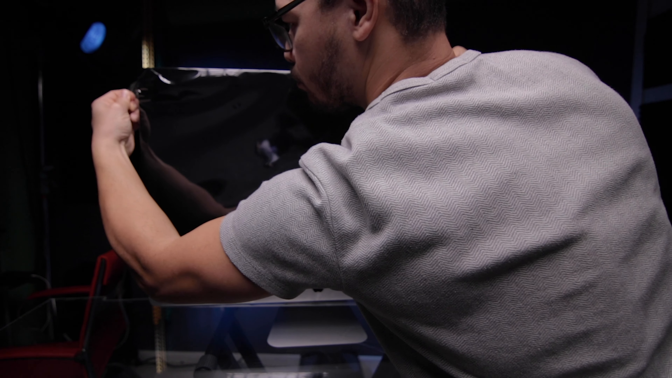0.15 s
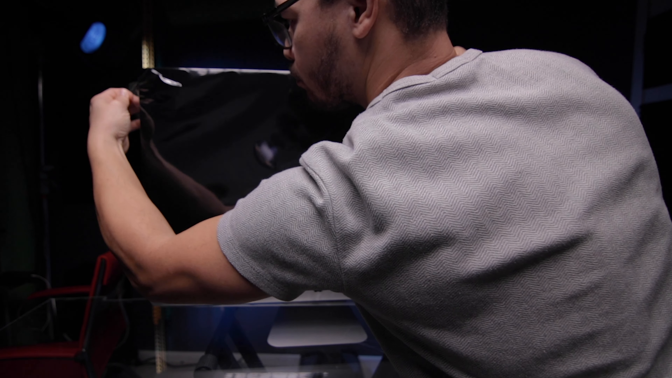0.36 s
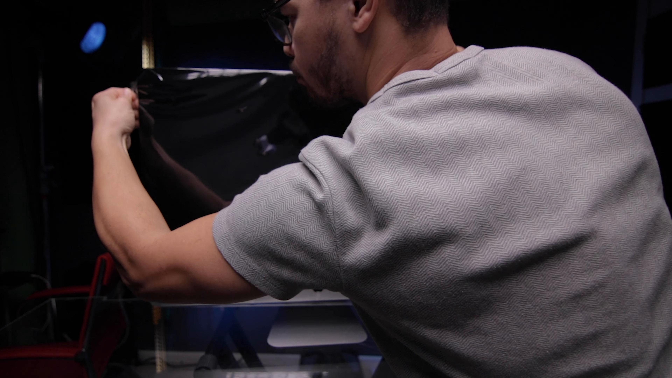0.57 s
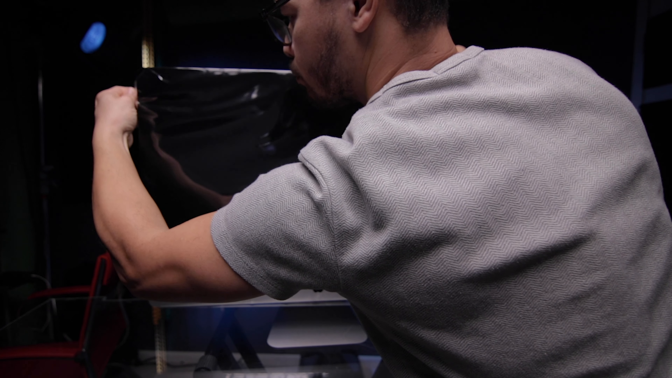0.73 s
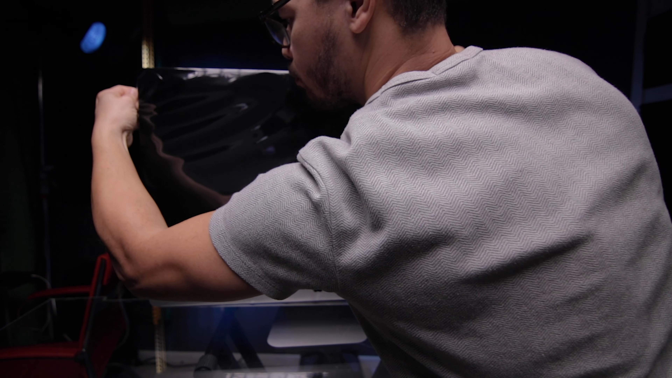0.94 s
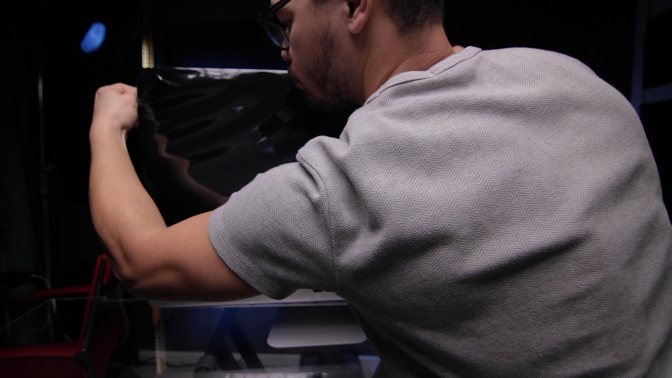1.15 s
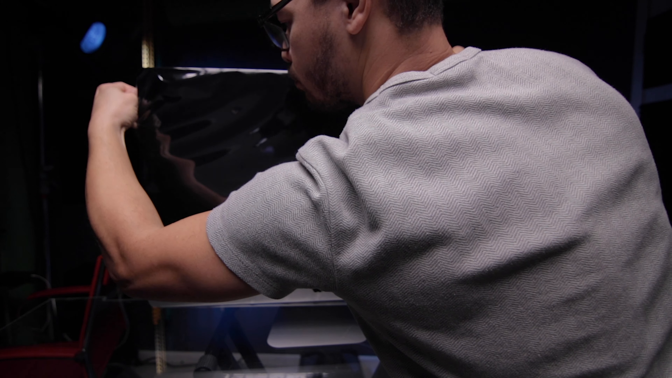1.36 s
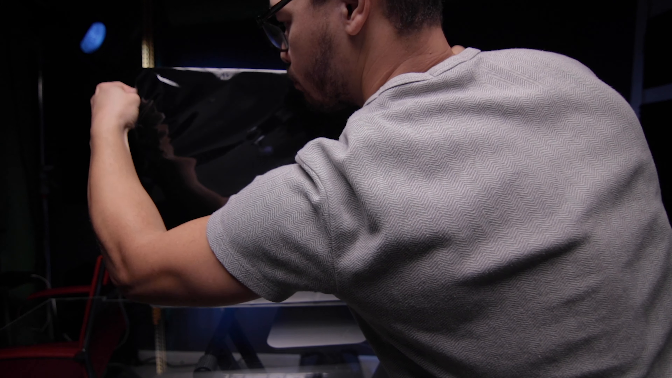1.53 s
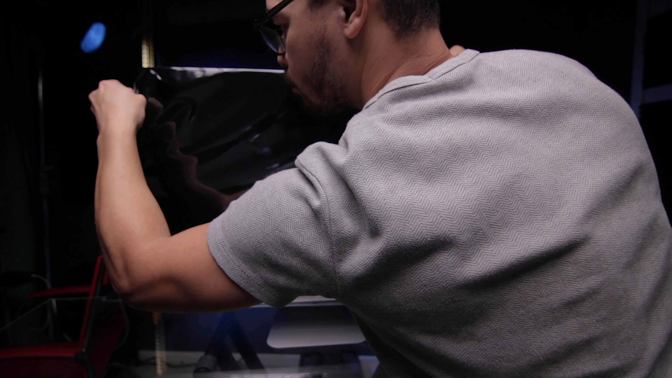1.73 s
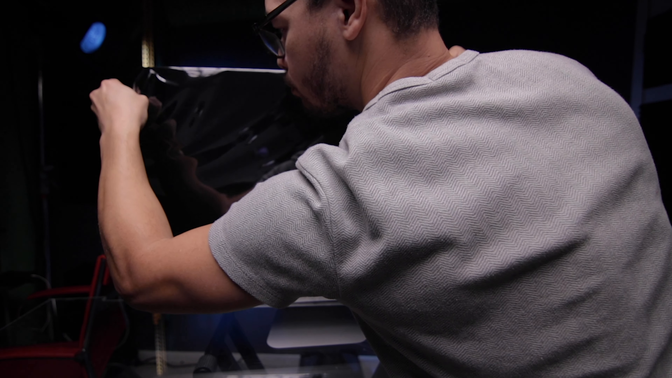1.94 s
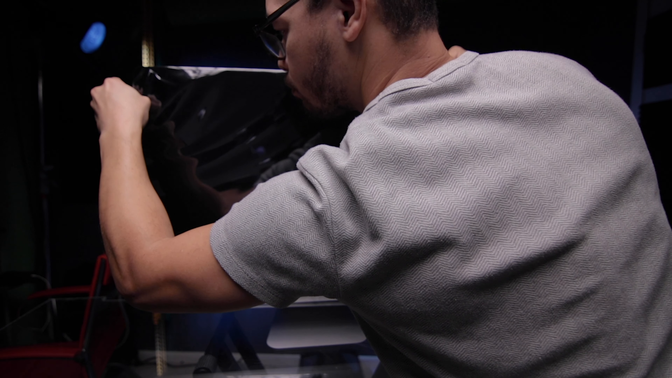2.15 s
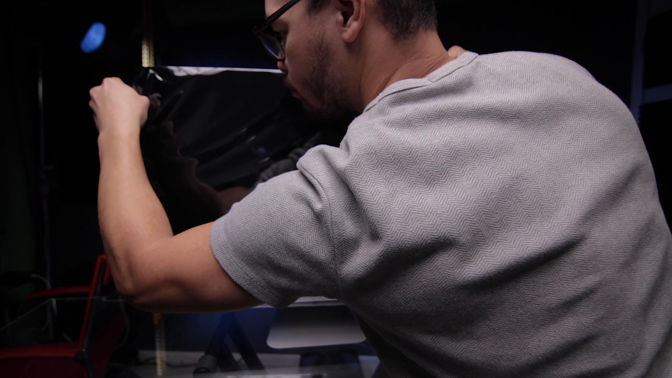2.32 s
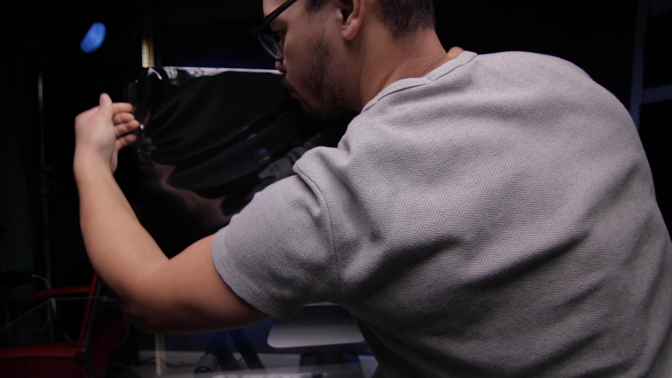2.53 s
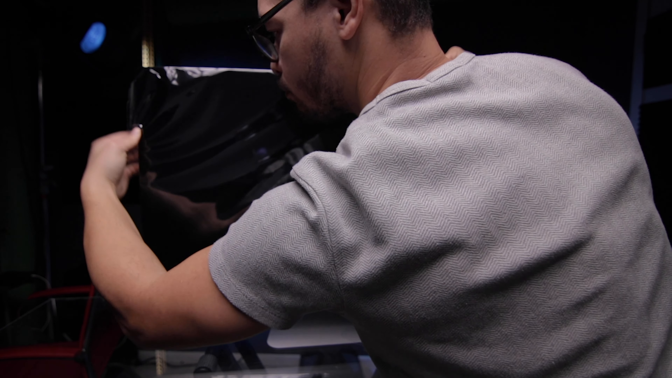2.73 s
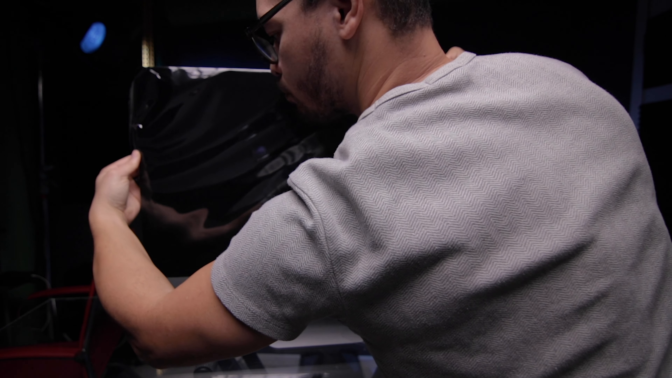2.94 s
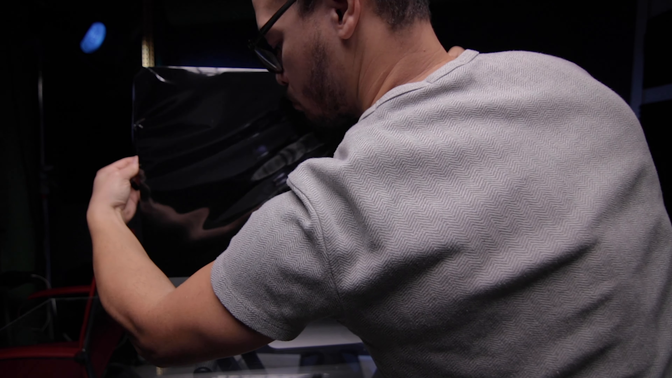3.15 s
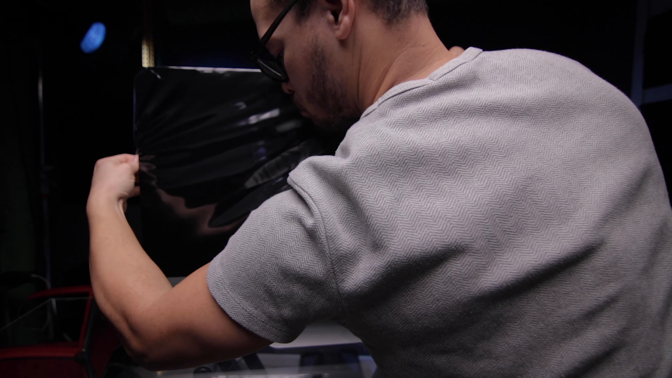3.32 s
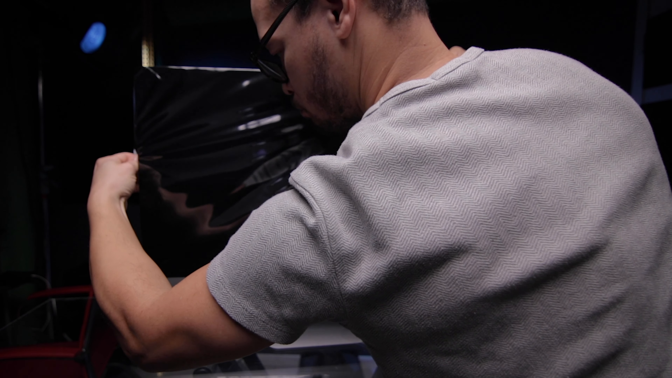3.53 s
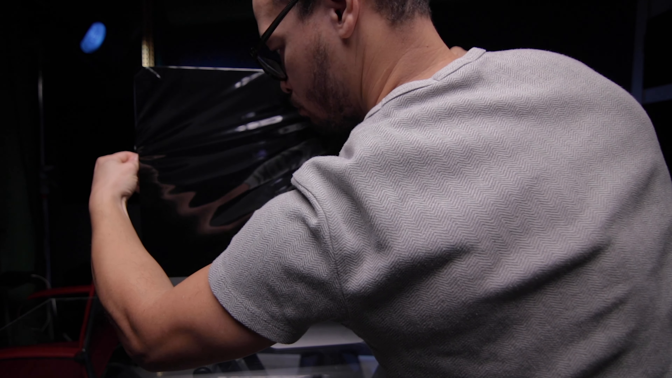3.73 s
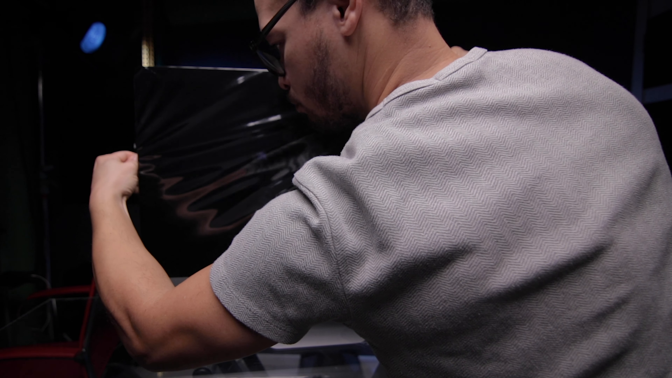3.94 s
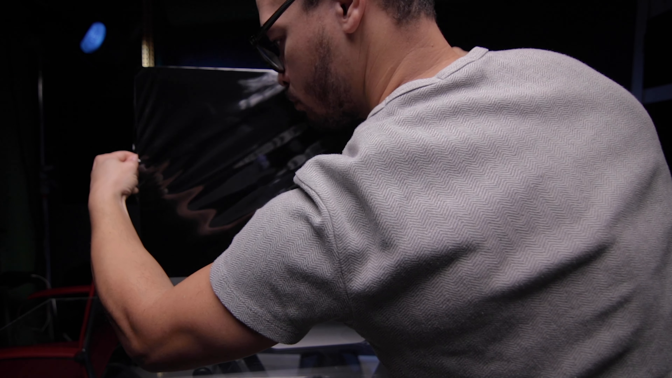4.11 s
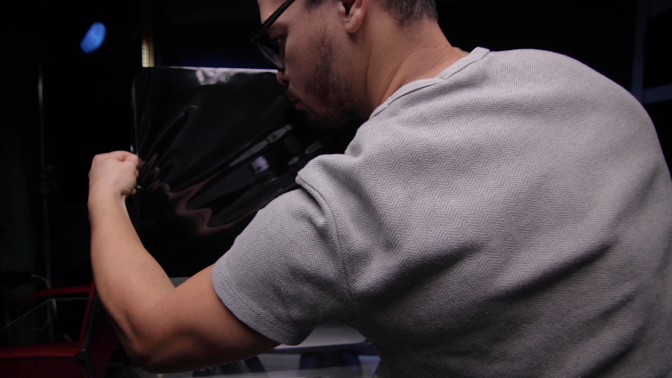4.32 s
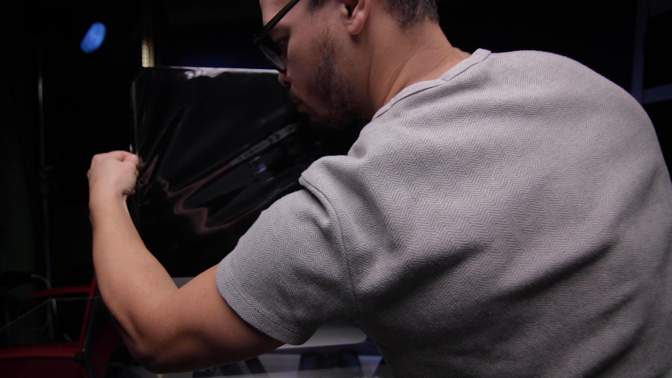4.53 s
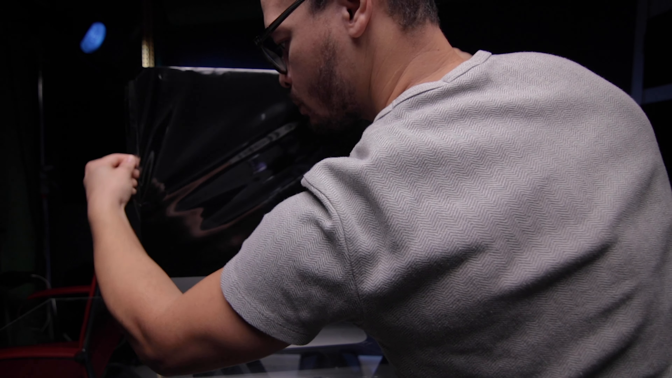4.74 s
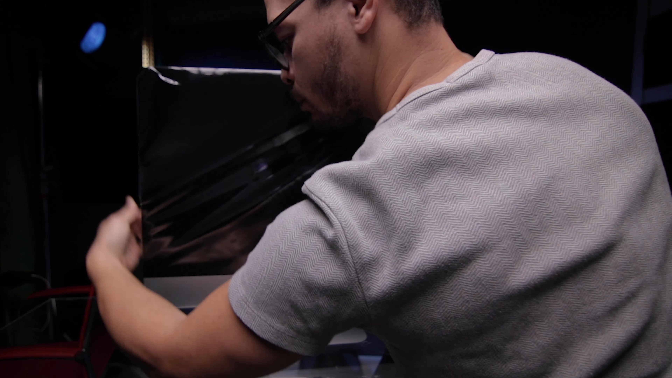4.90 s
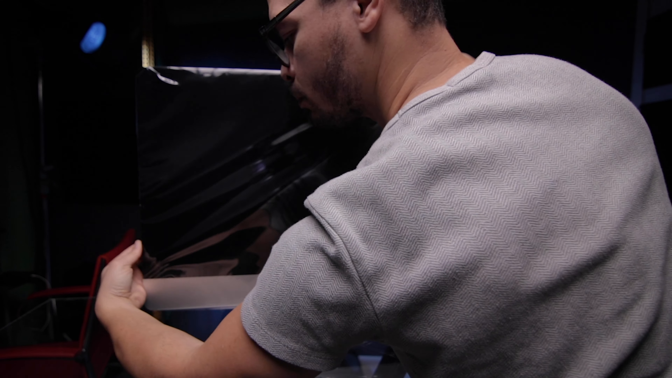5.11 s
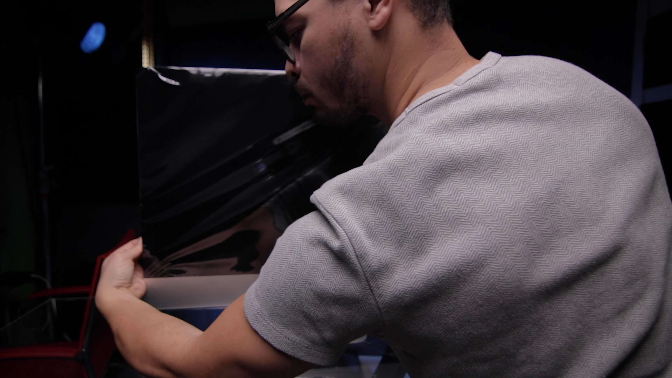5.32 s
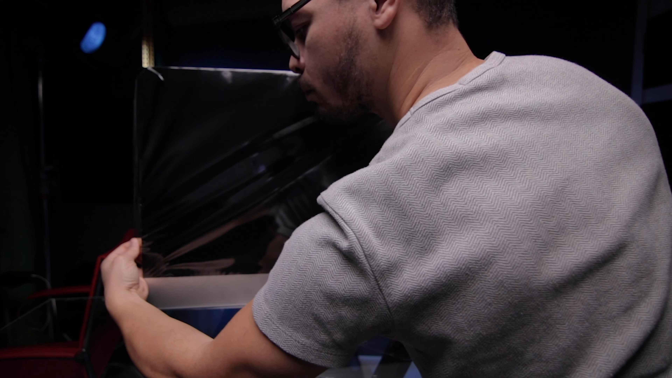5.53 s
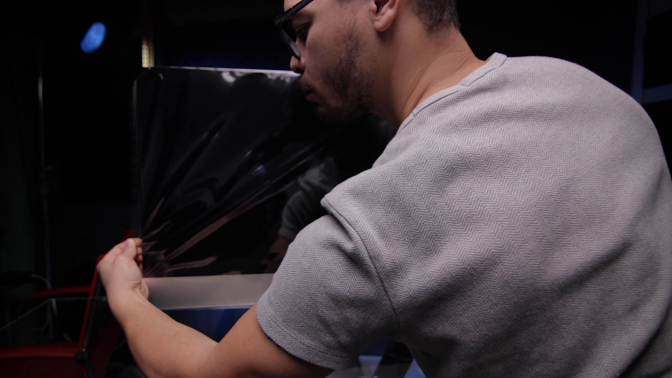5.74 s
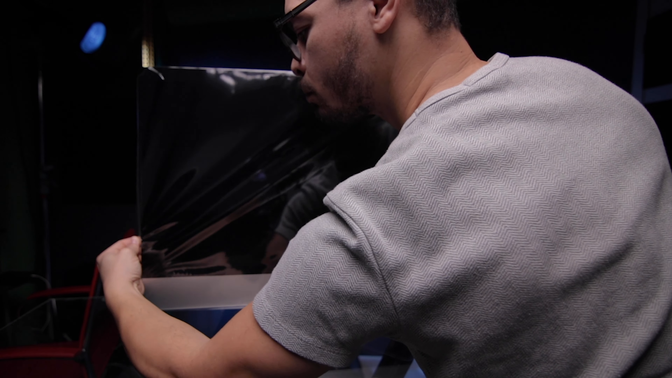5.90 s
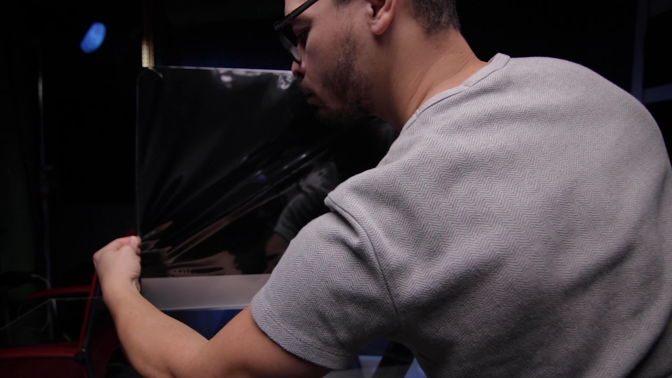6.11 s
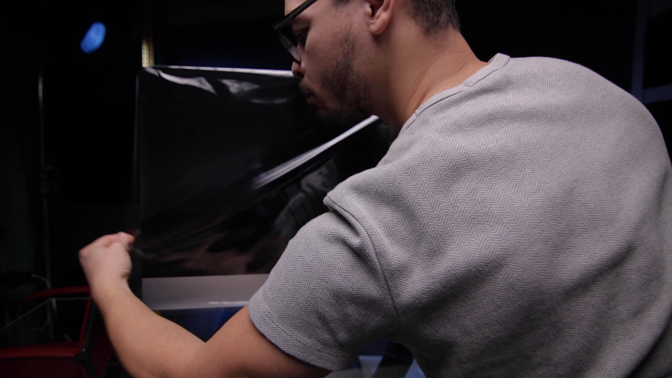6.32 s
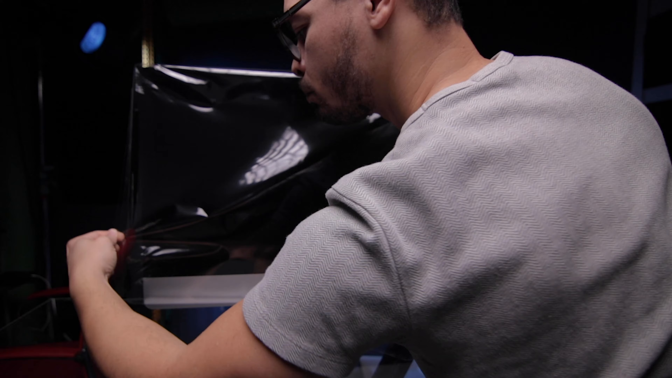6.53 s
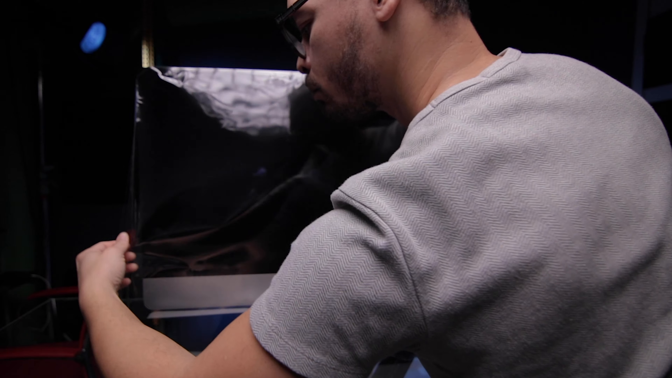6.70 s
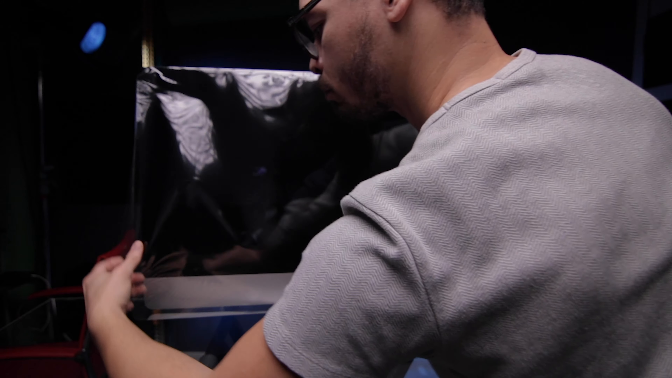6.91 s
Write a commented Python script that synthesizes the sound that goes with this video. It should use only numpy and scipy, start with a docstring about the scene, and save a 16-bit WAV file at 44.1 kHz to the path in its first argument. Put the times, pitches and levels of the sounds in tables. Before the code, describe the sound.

Taut plastic sheet lets go of smooth glass in jerks: dry, bright clicks over fine crackle, some with a hollow, drum-like flap. Clusters alternate with near-silent gaps; the last third is busiest and peaks in one loud snap and short rip before soft crumpling fades. Close microphone, small indoor room with short reflections, low background noise and slight high hiss.

```python
"""Bright cracks and hollow flaps over fine crackle: a thin protective film is pulled off a large glass
screen in a small, dry room. The glue lets go in jerks; each is a filtered click: crease crack, sheet pop, fizz.
Taut film drums in decaying sines and the screen rings faintly at fixed modes. Random clicks make the
peel line crackle; ringing clicks make the film flex and crinkle, strongest towards the end.
Echoes and a short noise tail form the room; steady coloured noise and a faint, slowly varying hiss lie beneath."""
import sys
import numpy as np
from scipy import signal
from scipy.fft import rfft, irfft, next_fast_len
from scipy.io import wavfile

SR = 44100
rng = np.random.default_rng(int(sys.argv[2]) if len(sys.argv) > 2 else 0)


def generate_wav(signal):
    """Clip the signal to [-1, 1] and save it as 16-bit WAV at the path in sys.argv[1]."""
    frames = np.transpose(np.atleast_2d(signal))
    scaled = np.clip(frames, -1, 1) * 32767
    pcm = np.round(scaled).astype(np.int16)
    wavfile.write(sys.argv[1], SR, pcm)


N = 306936
TIME = np.arange(N) / SR
CUTOFF_HZ = 15900
PLACES = 4  # along the peel line

# pulls of the hand, which load the peel line and flex the sheet:
# hold_start_s, hold_s, crackle_db, flex_db
PULLS = [(0.032, 0.045, -61, -76), (0.318, 0.079, -66, -60.5), (0.546, 0.012, -80, -67),
         (.88, .02, -64, -58), (1.26, 0.028, -70, -54), (2.5, 0.082, -56.5, -56.5),
         (2.682, 0.011, -66.5, -59), (2.912, 0.14, -65, -71.5), (3.2, 0.21, -70, -70.5),
         (3.748, .005, -75, -67.5), (4.208, 0.044, -58.5, -70), (4.488, 0.019, -73.5, -66),
         (4.87, 0.051, -63, -60.5), (5.028, 0.041, -67, -63), (6.483, 0.046, -45.5, -72)]


def from_db(db):
    """Decibels to amplitude gain."""
    return 10 ** (np.asarray(db) / 20)


def rms_one(x):
    """Scale to unit rms."""
    return x / np.sqrt(np.mean(x ** 2) + 1e-20)


def at_hz(points, hz):
    """Interpolate (Hz, value) rows on a log-frequency axis."""
    freqs_hz, values = np.transpose(points)
    return np.interp(np.log(np.maximum(hz, 1)), np.log(freqs_hz), values)


def band(x, low_hz, high_hz, order=2):
    """Butterworth band-pass, kept below Nyquist."""
    high_hz = min(high_hz, .48 * SR)
    edges_hz = [min(low_hz, high_hz - 10), high_hz]
    return signal.sosfilt(signal.butter(order, edges_hz, "band", fs=SR, output="sos"), x)


def around(x, hz, octaves):
    """Broad resonance: a band of the given width, limited to 0.2-3 octaves."""
    half = 2 ** (np.clip(octaves, .2, 3) / 2)
    return band(x, hz / half, hz * half)


def coloured(x, spectrum):
    """Filter by (Hz, dB) rows and scale to unit rms."""
    size = next_fast_len(N)
    bins_hz = np.arange(size // 2 + 1) * SR / size
    shaped = rfft(x, size) * from_db(at_hz(spectrum, bins_hz))
    return rms_one(irfft(shaped, size)[:N])


def ring(x, hz, t60_s):
    """One mode: a unit click starts a decaying sine of height 1."""
    radius = from_db(-60 / (t60_s * SR))
    angle = 2 * np.pi * hz / SR
    # the tiny offset keeps the filter state out of denormals
    return signal.lfilter([0, np.sin(angle)], [1, -2 * radius * np.cos(angle), radius * radius], x + 1e-18)


def add(track, start_s, sound):
    """Mix a sound into the track at start_s."""
    at = max(0, round(start_s * SR))
    track[at:at + len(sound)] += sound[:max(0, N - at)]


def spells(rows, rise_s, fall_s):
    """Gain of (hold_start_s, hold_s, level_db) gestures: exponential rise, hold, exponential fall."""
    gains = []
    for hold_start_s, hold_s, level_db in rows:
        before_s = np.maximum(hold_start_s - TIME, 0)
        after_s = np.maximum(TIME - hold_start_s - hold_s, 0)
        gains.append(from_db(level_db) * np.exp(-before_s / rise_s - after_s / fall_s))
    return np.max(gains, axis=0)


def buckle(skitter, settle_s):
    """A crease flips in one sample, then skitters as decaying noise while the sheet settles."""
    t = TIME[:SR // 40]
    force = skitter * rng.standard_normal(len(t)) * np.exp(-t / settle_s)
    force[0] += 1
    return force


def at_level(sound, level_db):
    """Scale a snap so its whole energy equals level_db rms held for snap_s."""
    snap_s = .004
    return sound * from_db(level_db) * np.sqrt(snap_s * SR / np.sum(sound ** 2))


def snaps(pop_skitter, crease_skitter, fizz_hz=9500):
    """As the glue lets go, a wide panel pops, a crease cracks, the glue fizzes; one track per place."""
    # creases: start_s, pop_db, pop_hz, pop_octaves, crack_db, crack_hz, crack_octaves, fizz_db
    creases = [(0.0212, -62, 585, 2.8, -41, 4400.0, 1.5, -45),
               (0.0692, -57.5, 610.0, 1.7, -23.5, 6800, 1.14, -32),
               (0.1201, -69, 390.0, 0.6, -47, 2920, 2.0, -76.5),
               (0.163, -56, 575, 6.6, -64.0, 7600.0, 0.9, -70.5),
               (0.201, -50.5, 700, 1.3, -55, 4600.0, 1.7, -65.5),
               (0.283, -47.5, 865, 2.5, -69, 6000.0, 1.3, -69),
               (0.3041, -9, 785, 0.95, -22, 4940, 1.8, -34),
               (0.3482, -36, 780.0, 1.7, -27, 6800, 1.44, -29.5),
               (0.3793, -29, 1150.0, 1.2, -36, 4000.0, 0.66, -62.5),
               (0.4045, -17.5, 928, 1.7, -21, 4900.0, 1.2, -38),
               (0.7835, -49, 1310.0, 1.06, -27.5, 6700, 1.3, -47),
               (0.816, -35, 1600, 0.61, -23.5, 5430, 0.88, -22.5),
               (0.8255, -50, 1190.0, 1.7, -21.5, 5800.0, 2.3, -41.5),
               (0.83, -38, 1310.0, 0.67, -35, 5400.0, 0.95, -33),
               (0.8394, -39.5, 920, 0.79, -26, 4900.0, 0.91, -44),
               (0.8491, -44, 1560.0, 1.9, -29, 7800.0, 1.0, -39),
               (0.9365, -52.5, 1040, 2.3, -24, 7480, 0.57, -37),
               (1.0174, -63.5, 664, 2.2, -37.0, 6800.0, 1.84, -57.5),
               (1.1173, -44.5, 1010, 1.16, -26, 6500.0, 1.36, -45.5),
               (1.2488, -35.5, 1590, 1.54, -19.0, 7100.0, 0.85, -38),
               (1.2984, -41.0, 1240.0, 1.9, -37, 6260, 0.8, -63.5),
               (1.3061, -42, 990.0, 2.1, -24.5, 7500, 1.2, -35.5),
               (1.3349, -32.5, 1190.0, 2, -27.5, 5630, 1.1, -46),
               (1.3536, -28.5, 804, 0.67, -25, 5600, 1.23, -54),
               (1.3653, -47, 705, 0.97, -34, 3800.0, 1.7, -65),
               (1.379, -55.5, 1190.0, 2.1, -40, 5300, 0.8, -71),
               (1.5448, -53, 1270.0, 1.7, -28.5, 6240, 0.84, -46),
               (1.5578, -38.0, 1160.0, 1.6, -36.5, 4980, 0.4, -64),
               (1.6016, -44.5, 930.0, 2.1, -51, 5700.0, 0.6, -70.5),
               (1.718, -34.5, 890.0, 2.0, -46.5, 4580, 0.4, -69),
               (1.7298, -34.5, 1690, 1.7, -35.5, 5540, 0.58, -38),
               (1.7981, -41.5, 480.0, 3.2, -46.5, 4020, 1.0, -73),
               (1.816, -40.5, 660.0, 1.5, -33, 3900, 1.83, -54),
               (1.9384, -29.5, 1130.0, 1.37, -20, 7240, 0.9, -27.5),
               (2.1122, -62.5, 1003, 0.64, -41.5, 4970, 1.14, -64),
               (2.439, -43, 1117, 0.64, -35, 4150, 1.16, -61),
               (2.4823, -44.0, 670.0, 2.1, -37, 5540, 0.93, -59),
               (2.5364, -33.5, 620, 3.1, -19.5, 5900.0, 0.8, -44.5),
               (2.5389, -22, 714, 1.37, -20.5, 4670, 1.3, -57),
               (2.666, -45, 664, 2.2, -59, 6200.0, 0.51, -67.5),
               (2.6945, -32.5, 974, 0.58, -29.5, 6770, 0.71, -52.5),
               (2.8635, -56.5, 1010, 1.4, -28, 5720, 1.04, -59.5),
               (2.92, -48.5, 620.0, 0.9, -44.5, 5150, 1.03, -68),
               (3.197, -34.5, 1332, 4.3, -28, 6730, 0.53, -59),
               (3.2213, -36, 658, 1.74, -28, 4200, 2.3, -44),
               (3.3602, -45.5, 863, 3.4, -29.0, 7430, 1.5, -37),
               (3.3756, -52, 790.0, 1.5, -32.5, 7400.0, 1.2, -59),
               (3.4674, -64, 1172, 1.63, -50.5, 4500.0, 2.0, -73),
               (3.917, -74.5, 423, 1.5, -49, 4900.0, 1.2, -64.5),
               (4.0015, -51, 593, 0.97, -27, 7900.0, 1.2, -43),
               (4.1352, -70.5, 385, 2.05, -34, 6800.0, 1.4, -46),
               (4.2243, -48.5, 1000, 1.4, -31.5, 4700.0, 0.71, -71.5),
               (4.2367, -30.5, 1170, 1.15, -21.5, 5630, 1.43, -32.5),
               (4.2512, -39.5, 950.0, 2.6, -28, 4370, 0.76, -41),
               (4.2924, -56, 785, 1.06, -34.5, 5600.0, 0.63, -36),
               (4.4717, -48.5, 494, 1.1, -31.5, 4800.0, 1.5, -62),
               (4.5056, -48, 460, 2.4, -22, 5200.0, 1.27, -52.5),
               (4.5324, -34.5, 1645, 1.7, -36, 4800.0, 0.33, -71),
               (4.6176, -68.5, 480.0, 1.7, -24.5, 6100, 1.1, -42.5),
               (4.8015, -40, 527, 2.4, -43, 4200.0, 2, -71),
               (4.8088, -37.5, 840.0, 1.7, -28.5, 3900.0, 0.93, -63),
               (4.8356, -18.5, 1310, 1.7, -24, 6200, 1.24, -43),
               (4.8611, -26.5, 790, 2.4, -18.5, 4840, 0.55, -26.5),
               (4.875, -38, 400, 0.44, -19.5, 3200.0, 3.1, -36),
               (4.8896, -36, 570, 2.7, -32, 3900.0, 2.8, -43),
               (4.9589, -61, 620.0, 1.5, -32, 7800, 0.84, -35),
               (4.9869, -44, 455, 2.4, -48, 4200.0, 0.95, -67.5),
               (5.0478, -48.5, 450, 1, -55.5, 3660, 1.2, -75),
               (5.118, -52.5, 390.0, 1.74, -45.5, 4290, 1.2, -56.5),
               (5.3989, -52.5, 797, 2.45, -61.5, 6700.0, 0.41, -75.5),
               (5.5649, -50.5, 615, 2.15, -39.5, 3420, 1.8, -68.5),
               (5.5909, -19.5, 757, 1.6, -17, 3630, 2.4, -35),
               (5.6188, -38.5, 1180.0, 1.6, -32, 4300.0, 1.2, -27),
               (5.63, -50, 710.0, 1.6, -25.5, 4400.0, 1.9, -52),
               (5.6346, -26.5, 960, 1.9, -19, 6900, 0.98, -36),
               (5.6647, -38, 715, 1.7, -28, 4500.0, 1.4, -31),
               (5.6768, -40, 640.0, 1.2, -27, 5460, 1.05, -37),
               (5.694, -39.5, 920.0, 2.4, -27.5, 6160, 1.45, -54),
               (5.719, -37, 2490.0, 1.6, -23.5, 5660, 1.14, -25.5),
               (5.778, -43.5, 1440, 1.2, -41, 3900.0, 0.58, -74),
               (5.9076, -62, 1214, 2.5, -34.5, 5200.0, 0.97, -75.5),
               (5.915, -48.5, 890.0, 1.6, -23.5, 7680, 0.84, -44),
               (5.9517, -35.5, 2005, 1.3, -22.5, 7800, 1.5, -43),
               (6.182, -48, 2310, 1.5, -36.0, 7400.0, 0.28, -30),
               (6.1873, -34, 2600, 1.3, -33.5, 8200, 0.33, -53),
               (6.2157, -37.5, 1390, 1.8, -30, 7200, 0.64, -37),
               (6.2557, -30.5, 2570, 3.4, -24, 6020, 1.05, -33),
               (6.2872, -25.5, 1780, 1.03, -18.5, 6600, 1.36, -37),
               (6.333, -39.5, 1460.0, 1.5, -18, 5800.0, 0.7, -28.5),
               (6.3747, -14.5, 540, 1.32, -9.5, 5300, 0.94, -16),
               (6.4317, -34.5, 670.0, 0.7, -30, 4900.0, 2, -44),
               (6.567, -51, 1870, 1.0, -45.0, 5900.0, 0.71, -64),
               (6.6077, -38.5, 524, 2.1, -35, 2470, 1.5, -60),
               (6.6357, -22.5, 2400, 2.07, -28.5, 8600, 0.3, -49.5),
               (6.7574, -44, 1350.0, 0.71, -46.5, 2700.0, 0.4, -80),
               (6.7713, -56, 1320.0, 1.4, -55, 2400.0, 0.55, -73),
               (6.804, -50, 1110, 1.5, -46, 2400.0, 0.4, -78),
               (6.831, -44, 1420, 0.97, -48, 4100.0, 0.83, -83.5),
               (6.8351, -37, 1700, 0.32, -42, 2440, 1.2, -71),
               (6.9022, -53, 1210.0, 1.3, -58, 4500.0, 1, -72)]
    out = np.zeros((PLACES, N))
    for k, row in enumerate(creases):
        start_s, pop_db, pop_hz, pop_octaves, crack_db, crack_hz, crack_octaves, fizz_db = row
        pop = around(buckle(pop_skitter, settle_s=0.0055), pop_hz, pop_octaves)
        crease = buckle(crease_skitter, settle_s=0.0012)
        crack = around(crease, crack_hz, crack_octaves)
        fizz = band(crease, fizz_hz, CUTOFF_HZ)
        snap = at_level(pop, pop_db) + at_level(crack, crack_db) + at_level(fizz, fizz_db)
        add(out[k % PLACES], start_s, rng.choice([-1, 1]) * snap)
    return out


def tugs(partner_ratio=0.77, partner_db=-8):
    """The stretched sheet drums in two close modes that swell over about one cycle."""
    # start_s, level_db (main mode, before swell and decay), pitch_hz, t60_s
    drum_hits = [(0.163, -42.5, 290, 0.15), (.305, -32.5, 215, 0.056), (1.253, -46.5, 278, 0.14),
                 (1.797, -44, 289, 0.2), (2.539, -33.5, 210, 0.059), (2.694, -32.5, 1386, 0.054),
                 (4.475, -44, 310, 0.15), (4.498, -44, 324, 0.089), (5.4, -45.5, 569, 0.05),
                 (5.593, -47, 86, 0.17), (5.593, -32.5, 214, 0.1), (6.216, -37, 700, 0.065),
                 (6.215, -49, 1120, 0.076), (6.377, -45, 80, 0.16), (6.377, -33, 148, 0.088)]
    out, t = np.zeros(N), TIME[:SR // 4]
    for start_s, level_db, pitch_hz, t60_s in drum_hits:
        main = np.sin(2 * np.pi * pitch_hz * t)
        partner = np.sin(2 * np.pi * (pitch_hz * partner_ratio * t + rng.random()))
        swell = 1 - np.exp(-t * pitch_hz)
        decay = np.exp(-np.log(1000) * t / t60_s)
        add(out, start_s, from_db(level_db) * (main + from_db(partner_db) * partner) * swell * decay)
    return out


def clumps(per_s, depth_db):
    """Gain of small random surges, interpolated between random heights; rms 1."""
    heights = np.interp(TIME * per_s, np.arange(N), rng.standard_normal(N))
    return rms_one(from_db(depth_db * np.clip(heights, -2, 2)))


def crackle(gain, colour, per_s):
    """Countless tiny releases: clicks of random size at random moments."""
    clicks = rng.standard_normal(N) * (rng.random(N) < per_s / SR)
    return gain * coloured(clicks, colour)


def peel_line():
    """The peel line crackles: a steady creep, swells with each pull, surging rips."""
    # rips, where a whole strip lets go in one run: hold_start_s, hold_s, level_db
    rips = [(.307, 0.015, -38.5), (.407, 0.022, -37), (.825, 0.016, -38), (4.852, 0.013, -40),
            (5.595, 0.038, -30), (6.382, 0.035, -28.5), (6.5, 0.017, -46), (6.84, 0.006, -48.5)]
    # filter: freq_hz, gain_db (relative)
    peel_colour = [(150, -24.5), (500, -7.5), (900, -7.5), (2000, -1), (3500, -3), (6500, 2), (10000, -6.5),
                   (16000, -14.5)]
    creep_db = -76  # film only held taut
    pulling = spells(np.array(PULLS)[:, :3], rise_s=0.11, fall_s=0.088)
    ripping = spells(rips, rise_s=0.0036, fall_s=0.014) * clumps(per_s=220, depth_db=2.0)
    return crackle(from_db(creep_db) + pulling + ripping, peel_colour, per_s=3100)


def crinkle(gain, colour, per_s, spread_db, cycles, count=28):
    """Small film facets flip at random; each has its own pitch and a t60 of a few cycles."""
    sizes = from_db(spread_db * np.minimum(rng.exponential(1, N), 3)) * rng.choice([-1, 1], N)
    flips = sizes * (rng.random(N) < per_s / SR)
    facet = rng.integers(0, count, N)
    rings = np.zeros(N)
    for k, hz in enumerate(np.geomspace(250, 8000, count)):
        rings += hz * ring(flips * (facet == k), hz, cycles / hz)
    return gain * coloured(rings, colour)


def slack_film():
    """The loose film crumples when the hand eases: bursts of ringing facets."""
    # hold_start_s, hold_s, level_db
    crumples = [(.13, 0.06, -60), (1.068, .004, -62), (2.7, 0.012, -55.5), (3.225, 0.034, -62.5),
                (6.21, 0.19, -51.5), (6.45, 0.059, -53.5), (6.54, .04, -43.5), (6.66, 0.055, -53.5),
                (6.77, 0.078, -50.5), (6.93, .02, -54.5)]
    # filter: freq_hz, gain_db (relative)
    slack_colour = [(150, -18), (400, -2.5), (900, -6), (1600, 3), (2400, 6), (3600, -8), (6000, -18.5),
                    (16000, -39)]
    crumpling = spells(crumples, rise_s=0.0078, fall_s=0.021)
    return crinkle(crumpling, slack_colour, per_s=450, spread_db=6.5, cycles=8)


def flexing_sheet():
    """Pulls flex the sheet: lower-pitched facets ring over a faint resting level."""
    # filter: freq_hz, gain_db (relative)
    flex_colour = [(100, -21.5), (300, -4), (600, -1), (950, 0.5), (1500, -10.5), (4000, -24.5)]
    rest_db = -82.5  # film only held taut
    flexing = from_db(rest_db) + spells(np.array(PULLS)[:, [0, 1, 3]], rise_s=.025, fall_s=0.029)
    return crinkle(flexing, flex_colour, per_s=1000, spread_db=4.0, cycles=7.7)


def screen(x):
    """The film tugs on the panel, which rings at its own pitches."""
    # pitch_hz, gain_db, t60_s
    panel_modes = [(341, -46.5, 0.15), (550, -61, 0.11), (752, -50, 0.13), (977, -55.5, 0.092),
                   (1119, -52, .09), (1629, -62.5, 0.067)]
    return sum(from_db(gain_db) * ring(x, hz, t60_s) for hz, gain_db, t60_s in panel_modes)


def room(x, build_s=0.0014):
    """Two near echoes and a short diffuse tail with its own decay and gain in each band."""
    # tail decay: freq_hz, t60_s
    tail_t60 = [(100, 0.39), (400, 0.16), (1000, 0.12), (3000, 0.18), (7000, 0.16), (16000, 0.25)]
    # tail level: freq_hz, gain_db
    tail_send = [(100, 8), (400, -7.5), (1000, -7.5), (3000, -4), (7000, -11.5), (11000, -8), (16000, -12)]
    # near surfaces: delay_s, gain_db
    echoes = [(.0056, -16.5), (0.0194, -23.5)]
    t, edges_hz = TIME[:SR // 2], np.geomspace(70, 18000, 17)
    response = np.zeros(len(t))
    for low_hz, high_hz in zip(edges_hz, edges_hz[1:]):
        hz = np.sqrt(low_hz * high_hz)
        decay = np.exp(-np.log(1000) * t / at_hz(tail_t60, hz))
        build = 1 - np.exp(-(t / build_s) ** 2)
        tail = band(rng.standard_normal(len(t)), low_hz, high_hz) * decay * build
        # tail energy set to the band's share of the spectrum
        share = np.sqrt(2 * (high_hz - low_hz) / SR / np.sum(tail ** 2))
        response += tail * from_db(at_hz(tail_send, hz)) * share
    for delay_s, gain_db in echoes:
        response[round(delay_s * SR)] += from_db(gain_db)
    return signal.fftconvolve(x, response)[:N]


def high_hiss():
    """Faint high noise that swells and sinks."""
    # time_s, level_db
    hiss_level = [(0, -72), (1.5, -77), (2.4, -74.5), (2.8, -61.5), (3.6, -64.5), (4.3, -63.5), (4.9, -70),
                  (6.1, -73), (6.96, -88)]
    # filter: freq_hz, gain_db (relative)
    hiss_colour = [(1000, -22), (4000, -9), (7000, -3.5), (11000, -3.5), (13000, 3.5), (16000, -2)]
    level_db = np.interp(TIME, *np.transpose(hiss_level))
    return from_db(level_db) * coloured(rng.standard_normal(N), hiss_colour)


def background():
    """Quiet steady noise, strongest in the bass."""
    # filter: freq_hz, gain_db (relative)
    floor_colour = [(20, -30.5), (45, -14), (70, 1), (105, 4.5), (170, 0.5), (300, -5), (500, -10.5),
                    (750, -6.5), (1100, -18.5), (2000, -15.5), (5000, -20.5), (11000, -16), (16000, -13.5)]
    floor_db = -65
    return from_db(floor_db) * coloured(rng.standard_normal(N), floor_colour)


def scene():
    """Film, screen and room over a quiet background."""
    rustle = peel_line() + slack_film() + flexing_sheet()
    film = snaps(pop_skitter=0.047, crease_skitter=0.21).sum(axis=0) + rustle
    # walls take sound from all sides of a crease, so its skitter averages out; each place has its own paths
    to_walls = [*snaps(pop_skitter=0, crease_skitter=0), rustle]
    reflections = sum(room(source) for source in to_walls)
    return (film + tugs() + screen(film) + reflections + high_hiss() + background())[None]


def record(dry):
    """The microphone sheds deep bass; peaks beyond full scale clip; the top is cut."""
    mic_low_hz = 47.6
    high_pass = signal.butter(3, mic_low_hz, "high", fs=SR, output="sos")
    top_cut = signal.ellip(10, .2, 70, CUTOFF_HZ, fs=SR, output="sos")
    heard = signal.sosfilt(high_pass, dry)
    return signal.sosfilt(top_cut, np.clip(heard, -1, 1))


dry = scene()
out = record(dry)
generate_wav(out)
```